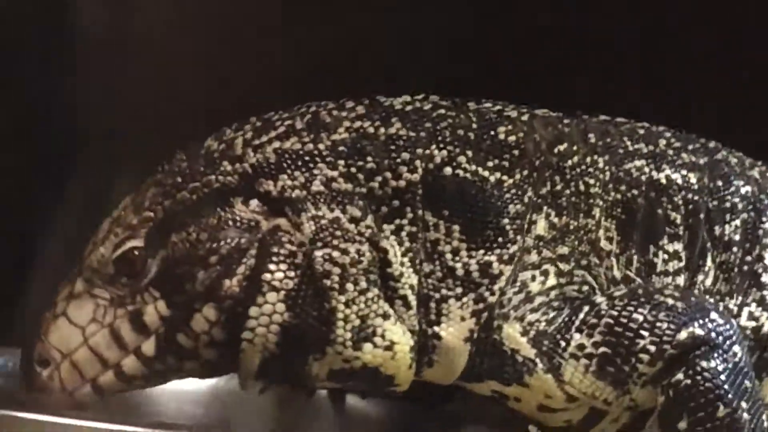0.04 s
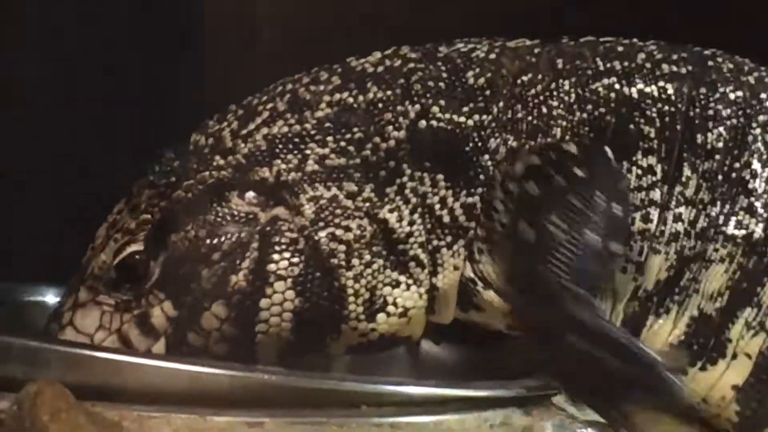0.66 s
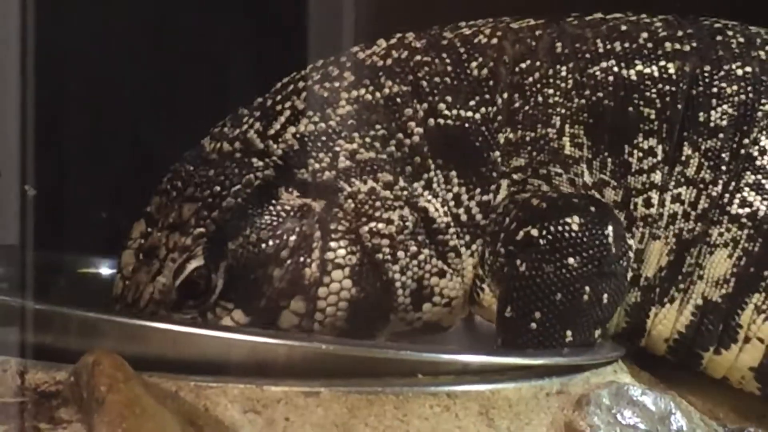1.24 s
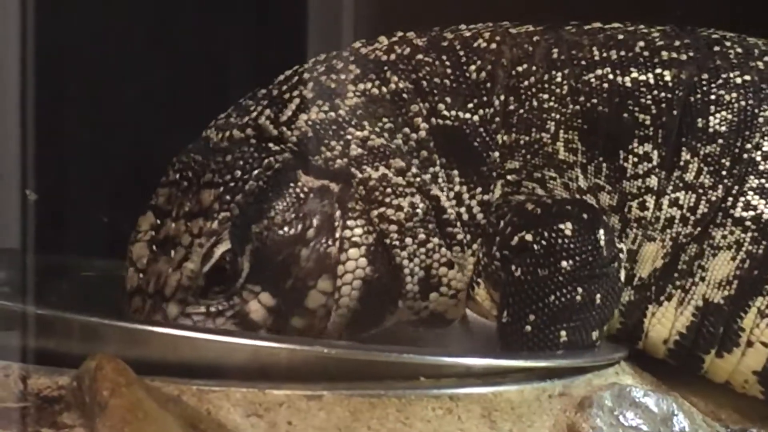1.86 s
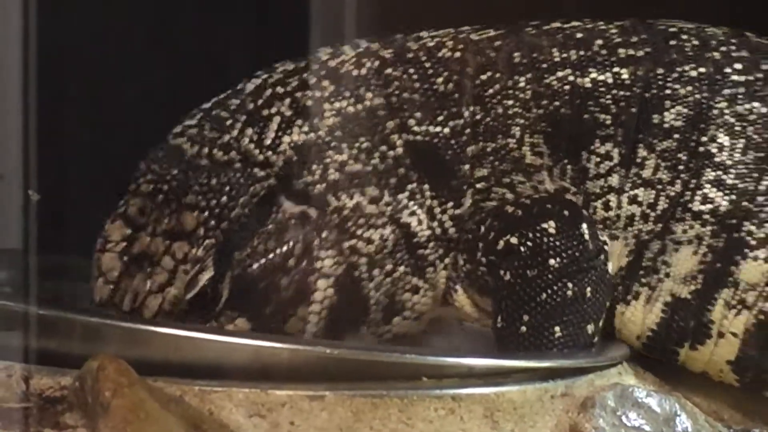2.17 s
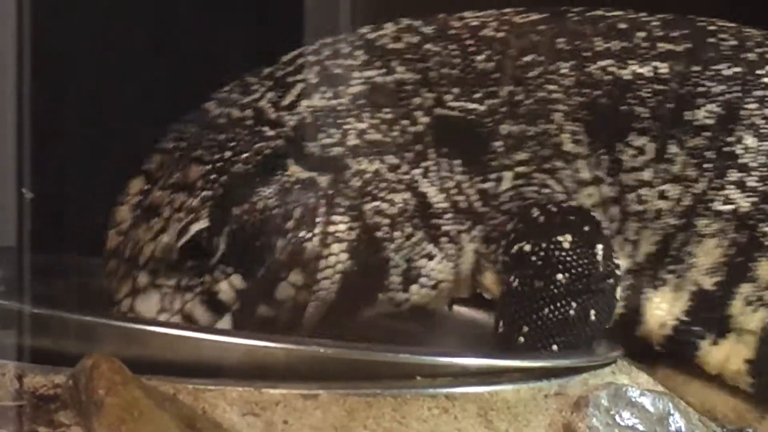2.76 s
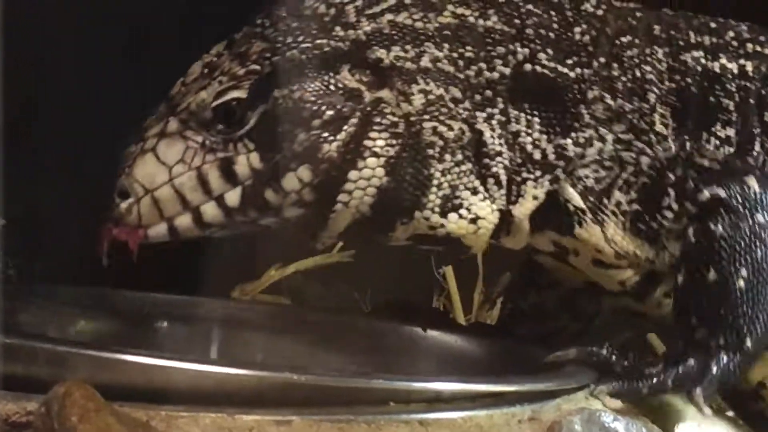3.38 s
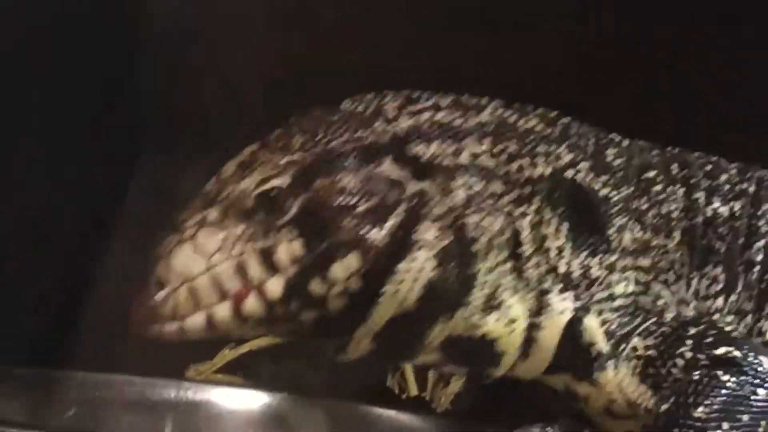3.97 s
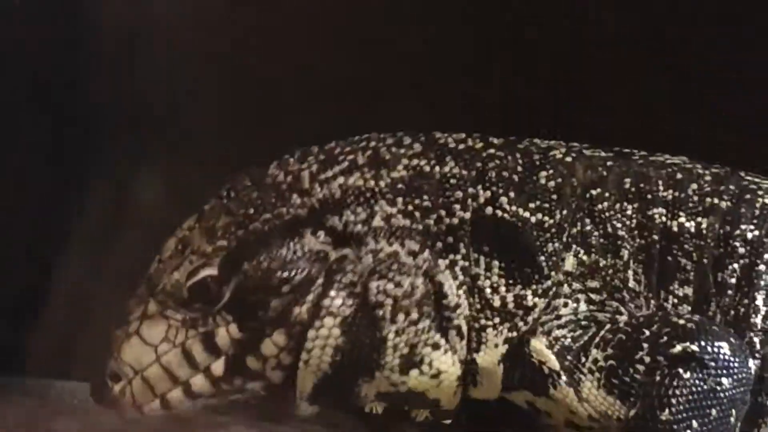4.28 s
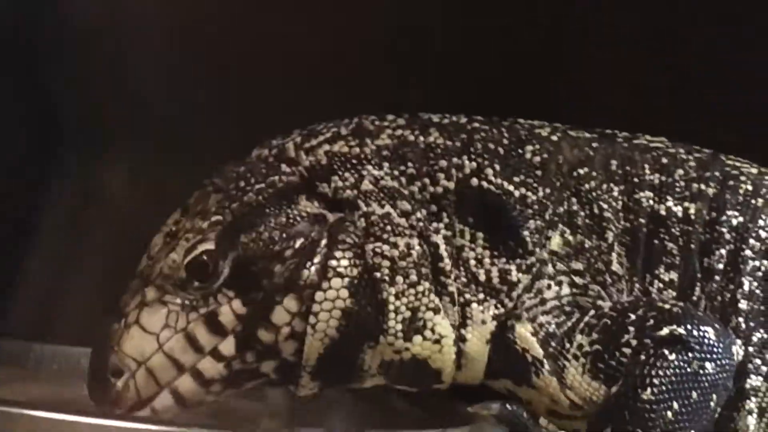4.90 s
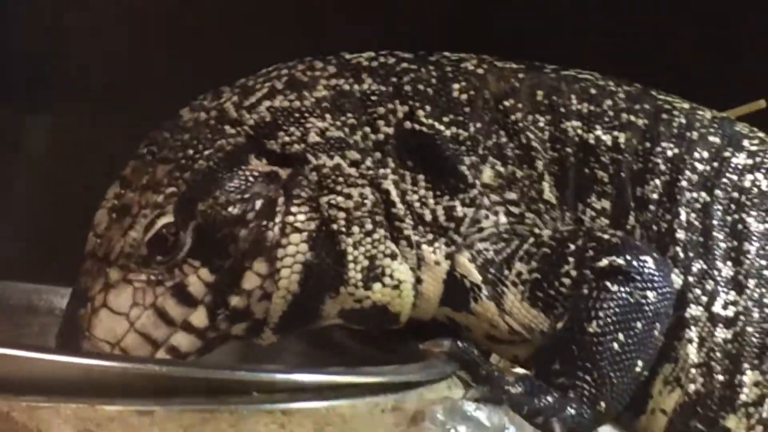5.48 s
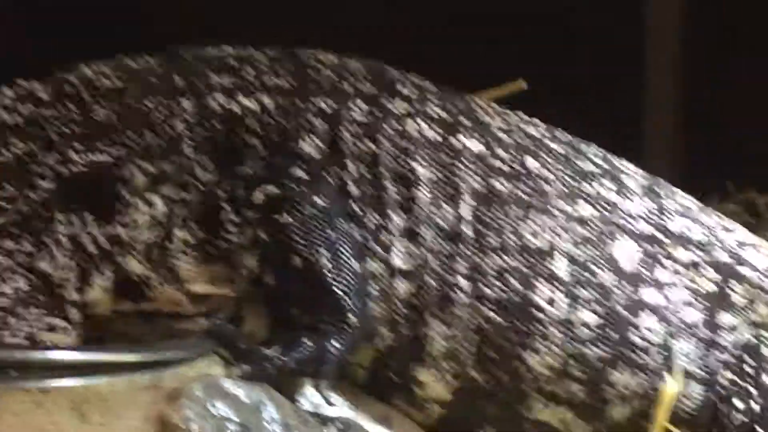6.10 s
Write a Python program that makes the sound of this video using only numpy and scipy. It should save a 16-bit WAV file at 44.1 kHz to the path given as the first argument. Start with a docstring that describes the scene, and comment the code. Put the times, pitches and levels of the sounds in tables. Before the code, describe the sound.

A large lizard feeds from a steel bowl inside a glass enclosure, heard from right beside it. A hollow clunk and a bright tick come first, then the bowl grinds softly as it is pushed. A sharp click of tooth or claw leads to more knocks, tiny mouth snaps and one soft lick. Two more clunks come near the end. Dry scales rasp in between, over a faint appliance hum.

```python
"""Lizard at a steel bowl

A large lizard feeds from a steel bowl on a stand inside a glass-walled enclosure. Snout and feet knock
the bowl and push it along; teeth and claws tick on the steel, scales rasp and squeak over the rim, the
mouth snaps and the tongue wipes once. The enclosure rings briefly after the blows. Underneath, the
heavy body shuffles and an appliance hums faintly."""
import sys
import numpy as np
from scipy import signal
from scipy.fft import rfft, irfft, next_fast_len
from scipy.io import wavfile
from scipy.ndimage import map_coordinates

SR = 44100
rng = np.random.default_rng(int(sys.argv[2]) if len(sys.argv) > 2 else 0)


def store_pcm(level_fs):
    """Save levels as 16-bit WAV."""
    pcm = np.round(np.clip(level_fs, -1, 1) * 32767).astype(np.int16)
    wavfile.write(sys.argv[1], SR, np.atleast_2d(pcm).T)


N = 270812
TIME = np.arange(N) / SR
RING = np.arange(int(.7 * SR)) / SR  # time axis of a one-shot, in seconds

# Room tone: freq_hz, level_db
AIR_EQ = [(15, -68), (36, -32), (59, -9), (86, -21), (150, -24), (190, -7.5), (284, -6), (414, -16),
          (654, -12), (812, -14.5), (1280, -17.5), (2590, -24), (3680, -23), (4820, -31), (15800, -40)]
# Partials of the appliance: pitch_hz, level_db
HUM_PARTIALS = [(118.6, -62), (199, -73.5), (300.5, -71.5), (356, -71.5)]
# The body shifts its weight: start_s, length_s, level_db
BODY_SHIFTS = [(0, 1, -66), (0.987, 0.45, -68), (1.92, 0.53, -64), (2.74, 0.22, -63), (3.077, 0.21, -68.5),
               (3.775, 0.34, -61), (4.226, 0.47, -67), (4.916, 0.4, -56.5), (5.58, 0.82, -65.5)]
# Dry rustle of scales, a low cut on it, and the dull shuffle of the belly: freq_hz, level_db
RUSTLE_EQ = [(530, -41), (900, -3), (1390, -9), (1830, -7), (2880, -13.5), (3130, -13.5), (3530, -15.5),
             (6660, -17), (15800, -31)]
RUSTLE_LOW_CUT = [(400, -16), (1100, 14)]
BELLY_EQ = [(35, -5), (150, 5.5), (220, -2), (310, 5.5), (500, -8.5), (780, -1.5), (1300, -33),
            (3000, -40)]
# The snout pushes the bowl: start_s, length_s, grind_db, judder_db
BOWL_PUSHES = [(1.203, 0.1, -52.5, -48.5), (1.446, 0.13, -56.5, -53), (1.877, 0.03, -51, -55.5),
               (1.99, 0.085, -52.5, -51.5), (2.169, 0.029, -44.5, -51.5)]
# Midrange grind of the sliding bowl: freq_hz, level_db
GRIND_EQ = [(400, -36), (620, 16.5), (720, 19), (775, 23.5), (840, 12.5), (930, 18), (1020, 5),
            (1130, 10.5), (1500, -50)]
# Low judder of the sliding bowl: freq_hz, level_db
JUDDER_EQ = [(100, 4), (190, 9), (310, 10), (450, 9.5), (600, -12), (800, -74)]
# Resonances of the hollow between snout and steel: centre_hz, width_hz, level_db
LICK_RESONANCES = [(1080, 160, 0), (1533, 250, 1.5), (2100, 200, -1.5), (2560, 1500, -3)]
# A scale catches on the steel: start_s, length_s, level_db, first_hz, last_hz
SCALE_SQUEAKS = [(0.335, 0.082, -64, 3220, 3230), (2.215, 0.077, -58.5, 3200, 2830),
                 (3.33, 0.069, -54.5, 3430, 3680)]
# Scales slide over rim and floor: start_s, level_db, rise_s, centre_hz, t60_s, flank_db_per_octave
SCALE_RASPS = [(0.208, -58, 0.0055, 3600, 0.45, 26), (0.328, -58, 0.025, 2960, 0.31, 17),
               (0.672, -48.5, 0.0072, 3060, 0.36, 9), (0.808, -43.5, 0.0097, 1860, 0.4, 12),
               (1.041, -51.5, 0.029, 2360, 0.24, 30), (1.214, -52, 0.022, 2650, 0.49, 7.5),
               (1.412, -61.5, 0.0045, 3400, 0.99, 14), (2.187, -45.5, 0.022, 1590, 0.49, 5.5),
               (3.11, -58.5, 0.015, 6300, 0.38, 15), (3.157, -57, 0.013, 7200, .16, 13),
               (3.226, -44.5, 0.0048, 1390, 0.67, 4.5), (3.25, -50.5, 0.051, 3020, 0.9, 2.5),
               (3.779, -60, 0.027, 4400, 0.24, 4.5), (4.095, -57, 0.02, 9150, 0.38, 24),
               (4.969, -57, 0.073, 3200, 0.65, 10), (5.168, -44, 0.025, 2710, 0.42, 6),
               (5.191, -54, 0.016, 2560, 0.66, 42), (5.706, -51, 0.0036, 1750, 0.93, 3),
               (5.794, -50, 0.006, 1740, 0.48, 8), (6.092, -43.5, 0.08, 1340, 0.5, 4.5)]
# Dry skin, too soft for the top treble: freq_hz, level_db
SKIN_EQ = [(400, 18.5), (1200, 10), (6000, -1), (9000, -4.5), (10500, -14), (15800, -12)]
# Snaps of the mouth: start_s, level_db
MOUTH_SNAPS = [(3.386, -42), (4.094, -40), (4.128, -51), (5.309, -55), (5.346, -42)]
# Dry click of a snap: freq_hz, level_db
SNAP_EQ = [(500, -5), (2800, 12), (6000, -3), (10000, -6), (13000, -13), (15800, -4)]
# Teeth and claws: start_s, level_db, tilt_db_per_octave, spot_hz, t60_s, ring_db, cutoff_hz
STEEL_TICKS = [(0.166, -61.5, 6, 8700, 0.08, -6, 11000), (0.208, -57.5, 1, 7500, 0.2, -5, 8500),
               (0.358, -58, -3, 3200, 0.055, -14, 8000), (0.8, -52.5, -1, 7900, 0.19, -12, 13000),
               (0.838, -49, 0, 7200, 0.23, -15, 16000), (0.862, -37, 4, 8100, 0.1, -1.5, 16000),
               (1.047, -55.5, -2, 2000, 0.24, 1, 5000), (1.055, -45, 1.5, 7140, 0.1, -13, 9100),
               (1.216, -50.5, -4, 4200, 0.25, -9, 7500), (1.941, -54, 3, 12400, 0.08, -21, 16000),
               (1.959, -56.5, 4, 8050, 0.054, 1, 9000), (2.819, -26, 3, 8050, 0.09, -9, 13500),
               (3.384, -47.5, -4, 4200, 0.11, -13, 11000), (3.785, -62, 13, 13000, 0.06, -19, 20000),
               (3.797, -54, -1, 3380, 0.15, -10, 9000), (4.19, -57, 6, 10300, 0.025, -15, 11000),
               (4.2, -51.5, -2, 2580, 0.016, -2.5, 7500), (4.271, -42.5, 3, 7300, 0.085, -5.5, 20000),
               (4.428, -47, -2.5, 4200, 0.1, -6, 11400), (5.194, -45.5, -3.5, 2670, 0.35, -13, 9000)]
# Bright colour shared by the ticks: freq_hz, level_db
TICK_EQ = [(200, -3), (1100, -4), (1600, 1), (2900, -4), (4000, 3.5), (5200, -2), (6100, 1), (8200, -1),
           (9200, -2), (11800, -1.5), (12800, -6), (15800, -9)]
# High modes of the steel: pitch_hz, level_db, t60_s
STEEL_MODES = [(1450, -4, .25), (1920, -3, .3), (2120, -6, .25), (2590, 0, .35), (3020, -9, .3),
               (3450, -5, .2), (4215, 0, .2), (4845, -9, .22), (5250, -7, .2), (6020, 1, .22),
               (6334, -3, .18), (6620, -6, .2), (7137, -4, .17), (7750, -4, .2), (8000, -2, .18),
               (8300, -4, .18), (8800, -3, .14), (9550, -4, .1), (10200, -7, .15), (11300, -8, .12),
               (11800, -3, .12)]
# Blows on the bowl: start_s, knock_db, contact_hz, contact_q, boom_db, boom_hz, hollow_db
BOWL_KNOCKS = [(0.672, -26, 760, 1.6, -18.5, 88.5, -20), (0.683, -30, 560, 1.4, -25, 102, -41),
               (0.692, -32, 403, 0.95, -34.5, 228, -50), (0.716, -33.5, 670, 0.67, -41, 205, -43),
               (0.825, -43, 260, 0.45, -52, 110, -65), (1.344, -50.5, 1080, 5, -69, 98, -72),
               (1.832, -53.5, 830, 11, -68, 98, -66), (1.889, -50.5, 800, 2.7, -64, 101, -55),
               (3.226, -44, 1140, 3.7, -39, 116, -49), (3.229, -35, 342, 5.3, -40, 121, -55),
               (3.253, -33, 378, 4.1, -25, 174, -46), (3.289, -36.5, 380, 3.9, -26.5, 88, -46),
               (5.033, -27, 333, 4.5, -25.5, 108.6, -42), (5.048, -35, 423, 0.58, -28, 158.4, -50),
               (5.163, -41, 610, 1.2, -44, 69, -65), (5.344, -52, 267, 2.2, -57, 98, -54),
               (5.705, -25, 317, 1.9, -16, 138, -36), (5.731, -32.5, 298, 2.2, -30, 153, -50),
               (5.757, -42, 320, 1.4, -34, 118, -45), (5.779, -42, 353, 3.2, -42, 122, -57),
               (5.793, -39, 364, 3, -50, 119, -59), (5.819, -42.5, 800, 0.77, -55, 151, -53)]
# The animal's weight lands on the stand: start_s, boom_db, boom_hz
WEIGHT_THUDS = [(0.816, -19.5, 88.5), (0.857, -31, 88), (1.297, -41.5, 80), (2.088, -33, 78),
                (2.275, -34.5, 67), (2.319, -40, 62), (3.234, -18, 65), (3.412, -40, 76),
                (4.105, -39.5, 69), (4.21, -43, 74), (4.4, -44, 71.5), (4.478, -45, 76), (5.225, -45, 72)]
# Low modes of the loaded bowl: pitch_hz, level_db, t60_s
BOWL_MODES = [(160, -1, .3), (205, -4, .25), (228, -4, .18), (290, -2, .26), (313, 1, .22), (345, -3, .2),
              (392, -1, .3), (447, 2, .2), (474, -5, .25), (535, -4, .2), (570, -2, .2), (668, -1, .2),
              (692, -3, .2), (722, -6, .2), (773, 0, .25), (850, -5, .22), (885, -6, .2), (935, -8, .22),
              (1109, -10, .2)]
# Standing waves between the walls, the hollow note of a hard blow: pitch_hz, level_db, t60_s
WALL_MODES = [(217, -1, .14), (451, 0, .14), (678, 0, .13), (1110, -14, .12)]
# The enclosure's answer to a blow: freq_hz, level_db
WALL_EQ = [(40, -52), (110, 12.5), (170, -6.5), (400, -3), (780, 7.5), (950, 2), (1120, -3), (1300, -15.5),
           (2400, -30), (5000, -43)]
# Noisy edge of a knock, and the rumble of the stand: freq_hz, level_db
EDGE_EQ = [(300, -14), (900, 8.5), (2200, -12), (4000, -49), (10000, -35)]
RUMBLE_EQ = [(25, -17), (45, -27), (65, 8), (130, -11), (220, -15), (500, -67), (1000, -100)]


def amp(db):
    """Decibels to gain."""
    return 10 ** (np.asarray(db) / 20)


def unit(x):
    """Scale to rms 1."""
    return x / np.sqrt(np.mean(x ** 2) + 1e-20)


def fade(t60):
    """Decay envelope of a one-shot: down 60 dB in t60 seconds."""
    return amp(-60 * RING / t60)


def filtered(x, gain):
    """Shape x with a gain that depends on frequency."""
    size = next_fast_len(len(x) + 8192)
    hz = np.fft.rfftfreq(size, 1 / SR) + 1
    return irfft(rfft(x, size) * gain(hz), size)[:len(x)]


def eq_gain(eq, hz):
    """Gain of an EQ curve, its points joined on a log frequency axis."""
    freq_hz, db = np.transpose(eq)
    return amp(np.interp(np.log(hz), np.log(freq_hz), db))


def noise(eq, size=len(RING)):
    """Coloured noise of rms 1."""
    return unit(filtered(rng.standard_normal(size), lambda hz: eq_gain(eq, hz)))


def wobble(rate):
    """A smooth random curve, rate knots a second."""
    return map_coordinates(rng.standard_normal(int(N * rate / SR) + 4), [TIME * rate])


def slips(rate, spread_db, size):
    """Friction: tiny impulses of uneven strength, about rate a second."""
    fires = rng.random(size) < rate / SR
    return fires * rng.choice([-1, 1], size) * amp(spread_db * np.clip(rng.standard_normal(size), -2, 2))


def gesture(start, length, attack_s, t60_s):
    """Envelope of one movement: it swells, holds to the end of its length and dies away."""
    attack = np.clip((TIME - start) / attack_s, 0, 1)
    return attack * amp(-60 * np.maximum(TIME - start - length, 0) / t60_s)


def whistle(pitch, width_hz):
    """A friction-driven resonance of rms 1: a band of noise following a pitch curve."""
    drive = rng.standard_normal((2, len(pitch)))
    a, b = (filtered(row, lambda hz: 1 / (1 + (hz / width_hz) ** 2)) for row in drive)
    phase = 2 * np.pi * np.cumsum(pitch) / SR
    return unit(a * np.cos(phase) + b * np.sin(phase))


def modes(table, scatter_db, detune):
    """Decaying partials, rms 1 at first; each blow rebalances them and the animal's load detunes them."""
    hz, db, t60 = np.transpose(table)[:, :, None]
    gain = amp(db + scatter_db * rng.standard_normal(hz.shape))
    hz = hz * (1 + detune * rng.standard_normal(hz.shape))
    waves = np.sin(2 * np.pi * (hz * RING + rng.random(hz.shape))) * fade(t60)
    return (gain * waves).sum(0) / np.sqrt((gain ** 2).sum() / 2)


def steel_gain(hz, width_hz, lift_db, scatter_db):
    """The bowl lifts the bands around its high modes, by amounts that vary from touch to touch."""
    centre, db, _ = np.transpose(STEEL_MODES)[:, :, None]
    lift = amp(lift_db + db + scatter_db * rng.standard_normal(centre.shape))
    centre = centre * (1 + .006 * rng.standard_normal(centre.shape))
    peaks = lift / (1 + (2 * (hz - centre) / width_hz) ** 2)
    return np.sqrt(1 + (peaks ** 2).sum(0))


def sprung(x, hz, q):
    """A mass on a springy contact: a resonant low-pass at hz."""
    w = 2 * np.pi * hz
    return signal.lfilter(*signal.bilinear([w * w], [1, w / max(q, .5), w * w], SR), x)


def add(track, start, sound):
    """Mix a sound in at start seconds."""
    first = round(start * SR)
    track[first:first + len(sound)] += sound[:max(N - first, 0)]


def room_tone():
    """The bed: still air and the gently wavering hum of an appliance."""
    hum = np.zeros(N)
    for hz, db in HUM_PARTIALS:
        waver = amp(2.6 * wobble(14) + 1.3 * wobble(3))
        phase = 2 * np.pi * hz * TIME + 1.06 * wobble(5)
        hum += amp(db) * waver * np.sqrt(2) * np.sin(phase)
    return hum + amp(-63) * noise(AIR_EQ, N)


def body_shuffle(resting_db=-66):
    """The heavy body never quite rests: each shift swells a dull shuffle and a dry rustle."""
    effort = amp(resting_db) + sum(amp(db) * gesture(start, length, attack_s=.048, t60_s=.41)
                                   for start, length, db in BODY_SHIFTS)
    catches = slips(rate=5000, spread_db=-2, size=N)
    rustle = unit(filtered(catches, lambda hz: eq_gain(RUSTLE_EQ, hz) * eq_gain(RUSTLE_LOW_CUT, hz)))
    belly = noise(BELLY_EQ, N)
    unrest = amp(2.2 * wobble(14))
    return unrest * effort * (belly + amp(-6) * rustle)


def bowl_slide():
    """Pushed by the snout, the bowl sticks and slips on its stand, grinding and juddering."""
    grind_level, judder_level = np.zeros((2, N))
    for start, length, grind_db, judder_db in BOWL_PUSHES:
        push = gesture(start, length, attack_s=.052, t60_s=.5)
        grind_level += amp(grind_db) * push
        judder_level += amp(judder_db) * push
    stick_slip = slips(rate=240, spread_db=3.5, size=N)
    nudges = amp(2 * wobble(28) - .5)
    grind, judder = (unit(signal.fftconvolve(stick_slip, noise(eq) * fade(.17))[:N])
                     for eq in (GRIND_EQ, JUDDER_EQ))
    return nudges * (grind_level * grind + judder_level * judder)


def tongue_lick(peak_s=4.607, level_db=-46, rise_s=.038, t60_s=.3, glide_per_s=.25):
    """The wet tongue slides without catching: one smooth swell whose resonances rise a little."""
    t = TIME - peak_s
    glide = 1 + glide_per_s * np.clip(t, -t60_s, t60_s)
    wipe = sum(amp(db) * whistle(hz * glide, width_hz) for hz, width_hz, db in LICK_RESONANCES)
    swell = np.exp(-(np.minimum(t, 0) / rise_s) ** 2 / 2)
    release = amp(-60 * np.maximum(t, 0) / t60_s)
    return amp(level_db) * unit(wipe) * swell * release


def scale_squeaks():
    """A scale catches on the steel and gives a brief, gliding chirp."""
    out = np.zeros(N)
    for start, length, db, first_hz, last_hz in SCALE_SQUEAKS:
        pitch = np.linspace(first_hz, last_hz, round(length * SR))
        add(out, start, amp(db) * whistle(pitch, width_hz=78) * np.sqrt(np.hanning(len(pitch))))
    return out


def scale_rasps():
    """Scales catch and let go in quick grains; the stroke swells, then dies in the enclosure."""
    out = np.zeros(N)
    for start, db, rise, centre_hz, t60, flank_db in SCALE_RASPS:
        def colour(hz):
            """The stroke's own band, softened by skin and lifted by steel."""
            off_centre = .76 * (hz / centre_hz - centre_hz / hz)
            band = (1 + off_centre ** 2) ** (-flank_db / (40 * np.log10(2)))
            return band * eq_gain(SKIN_EQ, hz) * steel_gain(hz, width_hz=130, lift_db=4, scatter_db=3)

        reverb = rng.standard_normal(len(RING)) * fade(.22)
        reverb[0] += 20  # the direct sound leads the reflections
        catches = slips(rate=600, spread_db=4.5, size=len(RING))
        grains = signal.fftconvolve(catches, reverb)[SR // 25:][:len(RING)]  # skip the build-up
        stroke = np.minimum(RING / rise, 1) * amp(-60 * np.maximum(RING - rise, 0) / t60)
        add(out, start, amp(db) * unit(filtered(grains, colour)) * stroke)
    return out


def mouth_snaps():
    """The mouth lets go of the meat with a tiny dry click, too light to ring the bowl."""
    out = np.zeros(N)
    for start, db in MOUTH_SNAPS:
        add(out, start, amp(db) * noise(SNAP_EQ) * fade(.01))
    return out


def steel_ticks(attack_s=.00083):
    """Teeth and claws strike the steel: a burst of wall reflections, high modes and a faint tail."""
    out = np.zeros(N)
    for start, db, tilt_db, spot_hz, t60, ring_db, cutoff_hz in STEEL_TICKS:
        def touch(hz):
            """A sharper point is brighter, and each spot on the bowl favours its own band."""
            bright_db = tilt_db * np.log2(np.maximum(hz, 1500) / 6000)
            spot_db = 6 / (1 + (14 * np.log(hz / spot_hz)) ** 2)
            return amp(bright_db + spot_db) / np.sqrt(1 + (hz / cutoff_hz) ** 8)

        def colour(hz):
            """The steel's peaks, shaped by this touch."""
            peaks = steel_gain(hz, width_hz=150, lift_db=6.5, scatter_db=2.5)
            return peaks * eq_gain(TICK_EQ, hz) * touch(hz)

        burst = unit(filtered(rng.standard_normal(len(RING)), colour))
        burst *= fade(t60) + amp(-15.5) * fade(3 * t60)
        excited = [(hz, level + 20 * np.log10(touch(hz)), decay) for hz, level, decay in STEEL_MODES]
        partials = modes(excited, scatter_db=2, detune=.002)
        ring = amp(ring_db) * partials * fade(5 * t60)  # a point that stays in contact damps the ring
        add(out, start, amp(db) * (burst + ring) * (1 - np.exp(-RING / attack_s)))
    return out


def contacts(rebound_s=.014):
    """Each blow and the bowl's weaker rock back, then the soft thuds; columns as in BOWL_KNOCKS."""
    for start, db, contact_hz, q, boom_db, boom_hz, hollow_db in BOWL_KNOCKS:
        yield start, db, contact_hz, q, boom_db, boom_hz, hollow_db
        yield start + rebound_s, db - 10.5, contact_hz, q, boom_db - 19, boom_hz, hollow_db - 21
    for start, boom_db, boom_hz in WEIGHT_THUDS:  # soft weight barely rings the bowl
        yield start, boom_db - 23, 352, .64, boom_db, boom_hz, -np.inf


def bowl_knocks():
    """Padded blows ring the low modes of the bowl and the enclosure, and set the stand booming."""
    out = np.zeros(N)
    hollow = sum((-1) ** k * amp(db) * np.sin(2 * np.pi * hz * RING) * fade(t60)
                 for k, (hz, db, t60) in enumerate(WALL_MODES))
    for start, db, contact_hz, q, boom_db, boom_hz, hollow_db in contacts():
        walls = noise(WALL_EQ) * (fade(.36) + amp(-4) * fade(.6))
        bowl = modes(BOWL_MODES, scatter_db=1.5, detune=.012) * fade(.9)  # damped by the leaning animal
        body = sprung(bowl + amp(-8) * walls, contact_hz, q)
        body /= np.std(body[:SR // 30])  # the first 33 ms set the level
        kick = sprung(signal.unit_impulse(len(RING)), contact_hz, q)  # the blow, ahead of the ringing
        edge = amp(-14.5) * noise(EDGE_EQ) * fade(.13)
        knock = body + edge + 1.08 * kick / kick.max()
        stand_note = np.sin(2 * np.pi * boom_hz * RING) * fade(.2)
        rumble = amp(-15) * noise(RUMBLE_EQ) * fade(.42)
        boom = (stand_note + rumble) * (1 - np.exp(-RING / .01))
        add(out, start, amp(db) * knock + amp(boom_db) * boom + amp(hollow_db) * hollow)
    return out


def scene():
    """The mono mix, heard from just beside the bowl."""
    hits = bowl_knocks() + steel_ticks() + mouth_snaps()
    friction = scale_rasps() + scale_squeaks() + tongue_lick() + bowl_slide()
    background = body_shuffle() + room_tone()
    return (hits + friction + background)[None]


def record(dry, low_cut_hz=42, top_hz=15950):
    """Master EQ: roll off the deepest bass and cut the very top of the treble."""
    low_cut = signal.butter(4, low_cut_hz, "high", fs=SR, output="sos")
    return filtered(signal.sosfilt(low_cut, dry[0]), lambda hz: hz < top_hz)[None]


dry = scene()
out = record(dry)
store_pcm(out)
```